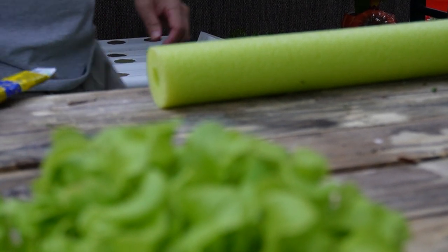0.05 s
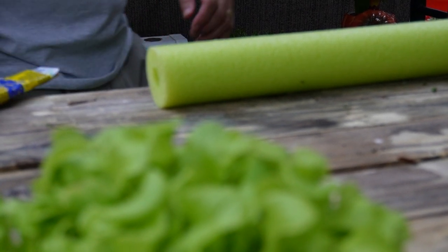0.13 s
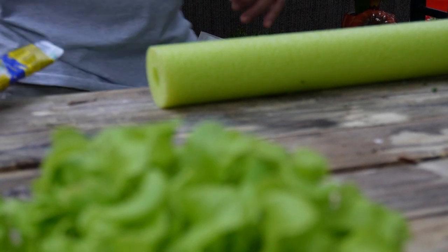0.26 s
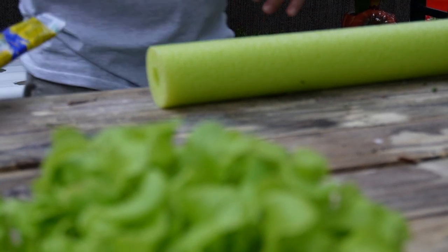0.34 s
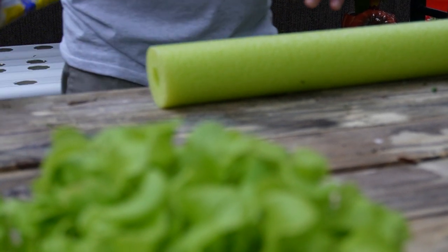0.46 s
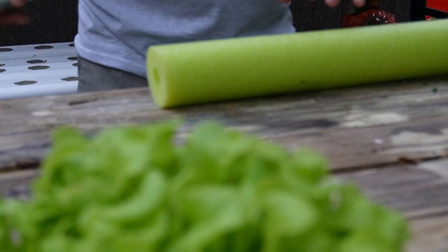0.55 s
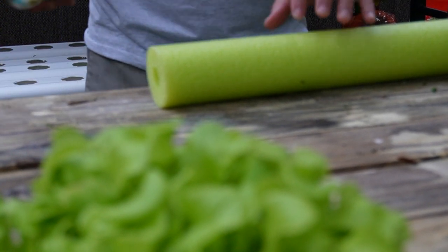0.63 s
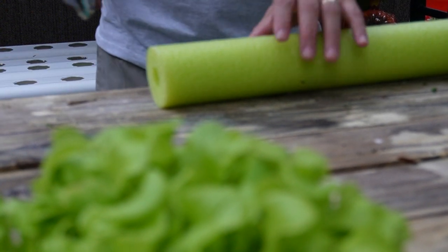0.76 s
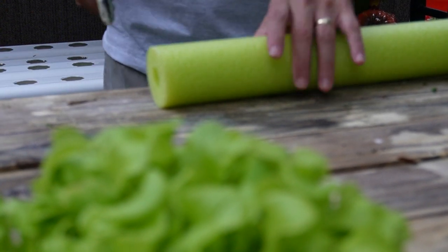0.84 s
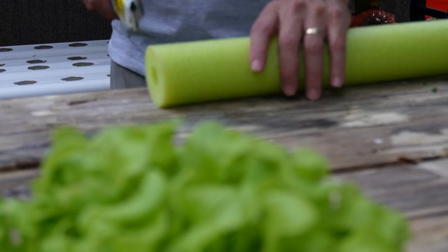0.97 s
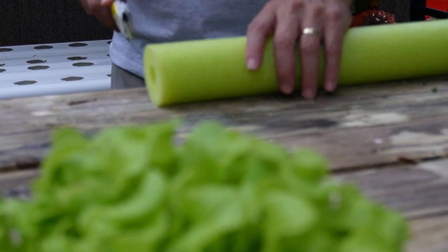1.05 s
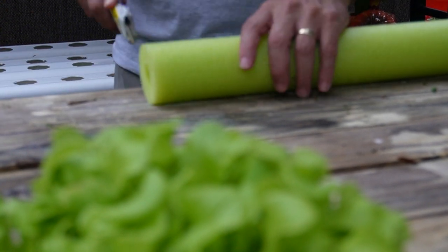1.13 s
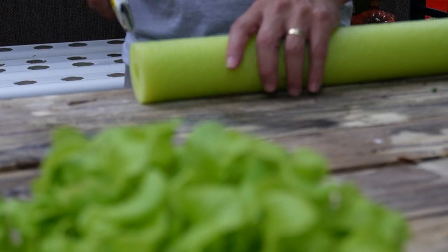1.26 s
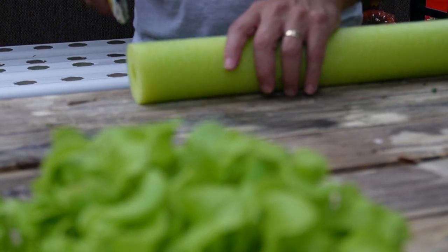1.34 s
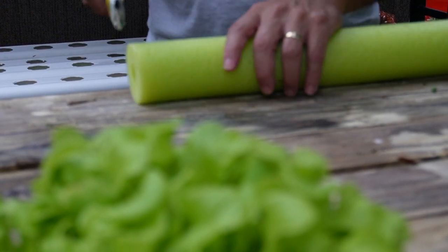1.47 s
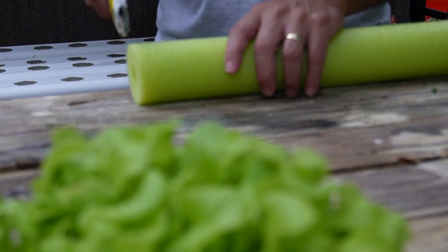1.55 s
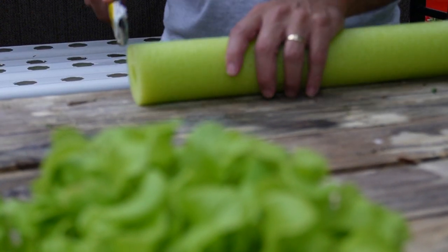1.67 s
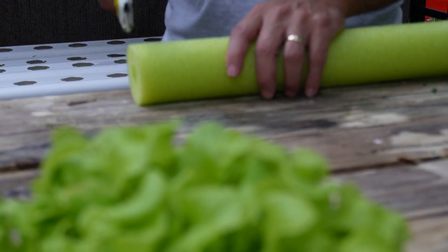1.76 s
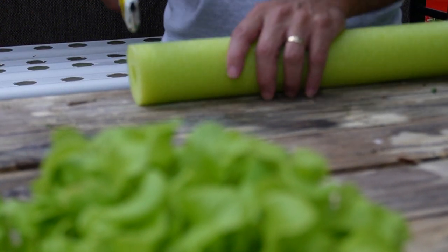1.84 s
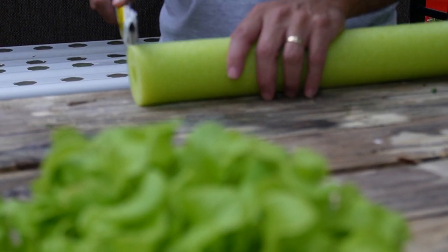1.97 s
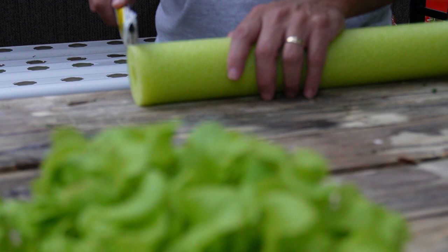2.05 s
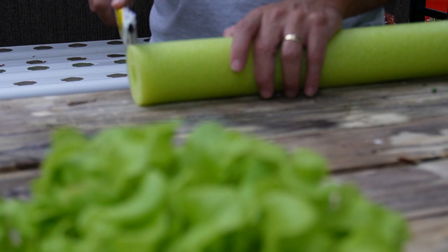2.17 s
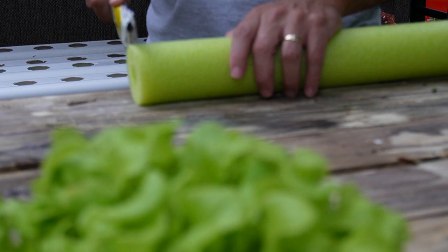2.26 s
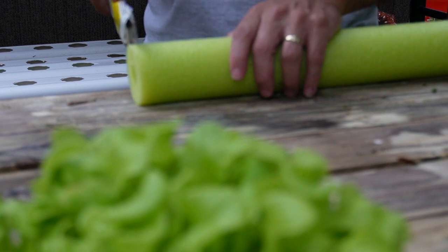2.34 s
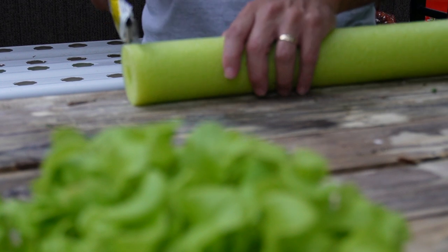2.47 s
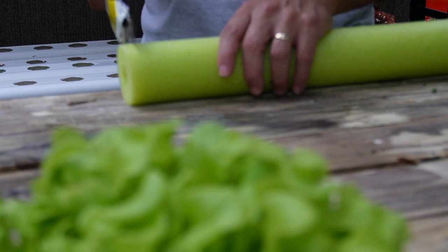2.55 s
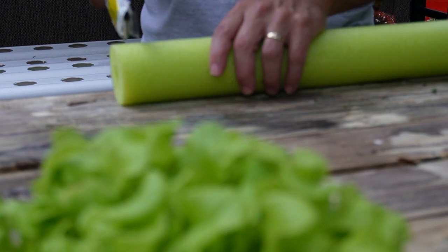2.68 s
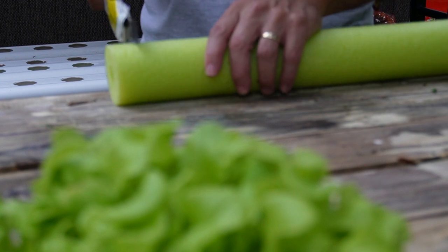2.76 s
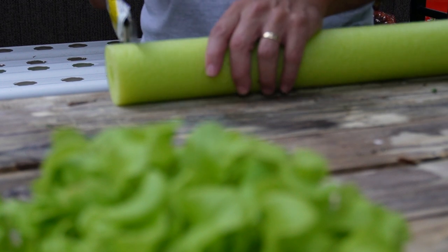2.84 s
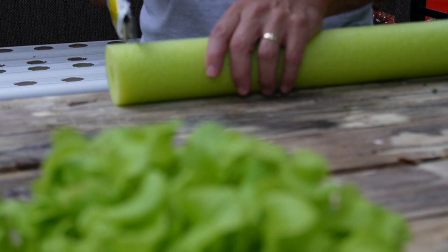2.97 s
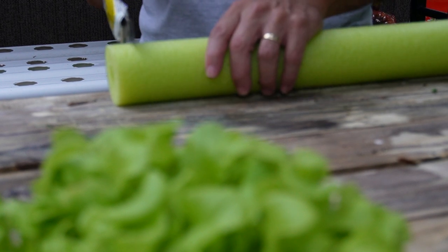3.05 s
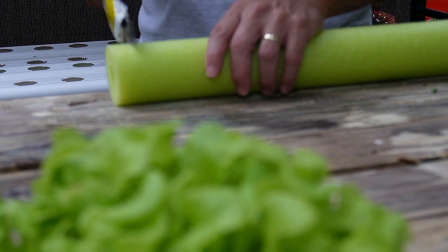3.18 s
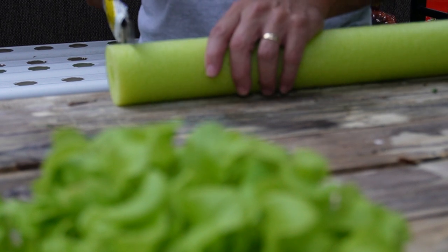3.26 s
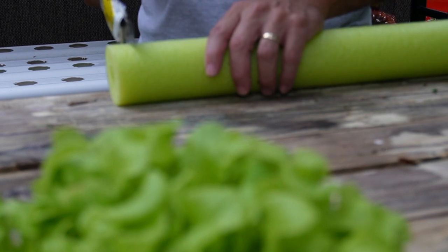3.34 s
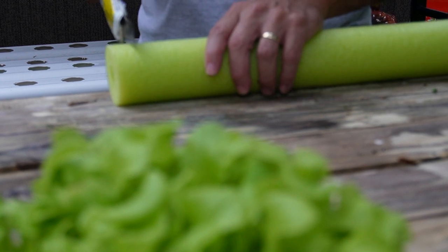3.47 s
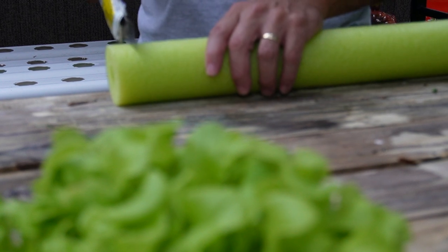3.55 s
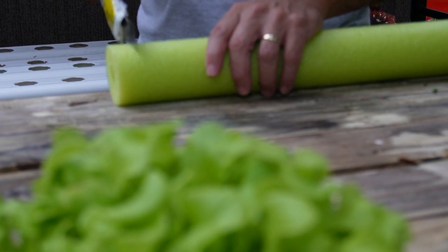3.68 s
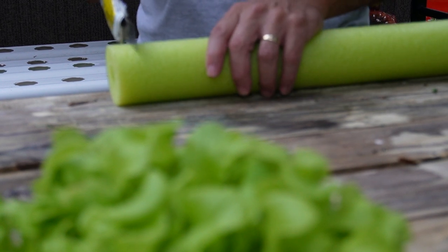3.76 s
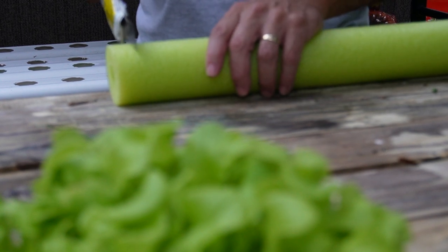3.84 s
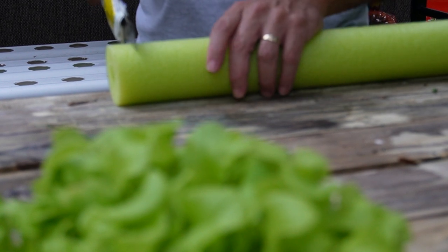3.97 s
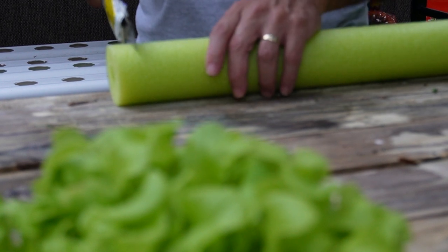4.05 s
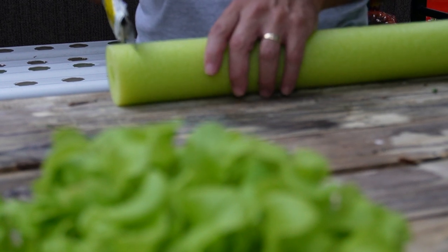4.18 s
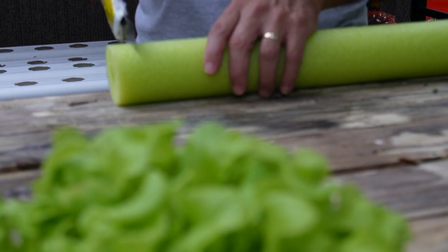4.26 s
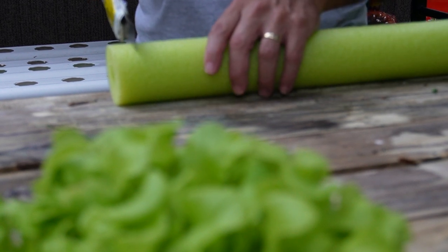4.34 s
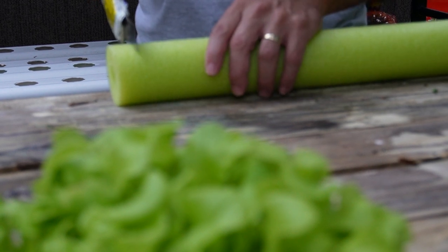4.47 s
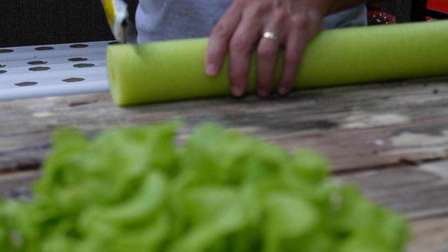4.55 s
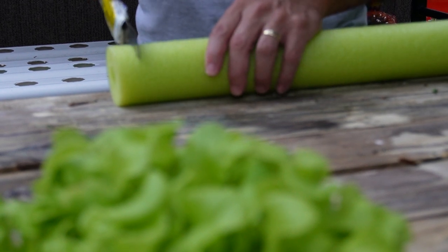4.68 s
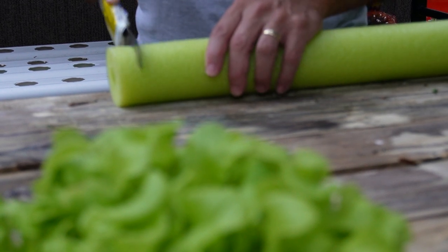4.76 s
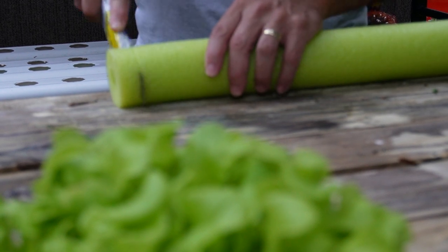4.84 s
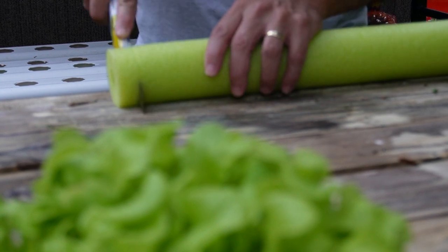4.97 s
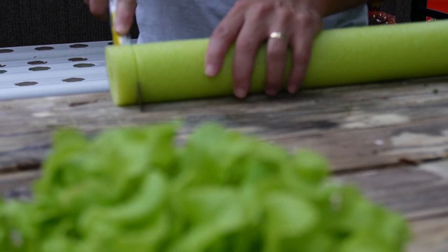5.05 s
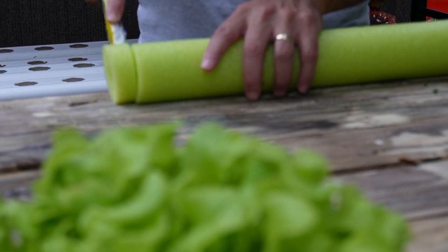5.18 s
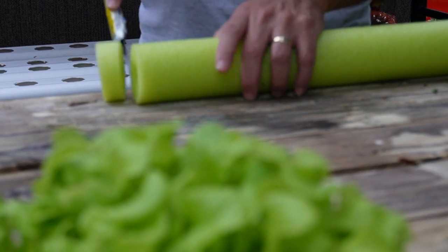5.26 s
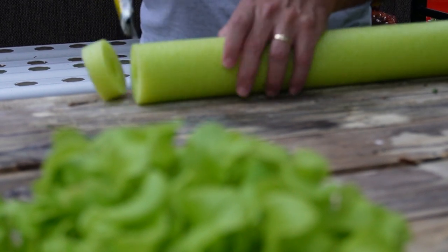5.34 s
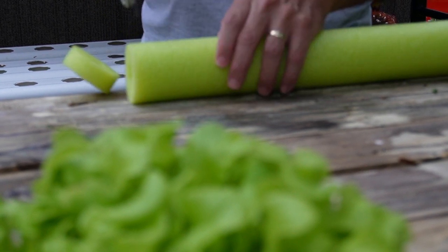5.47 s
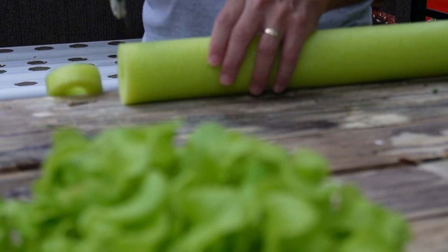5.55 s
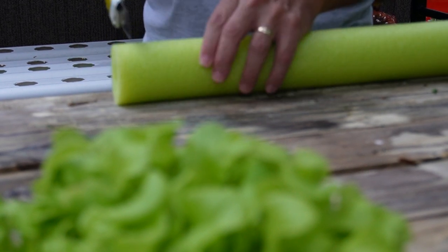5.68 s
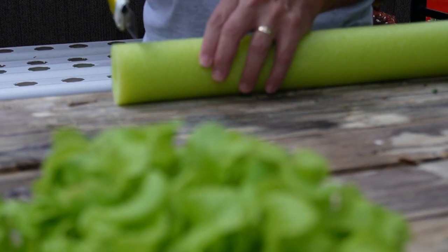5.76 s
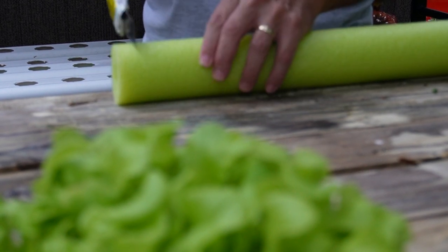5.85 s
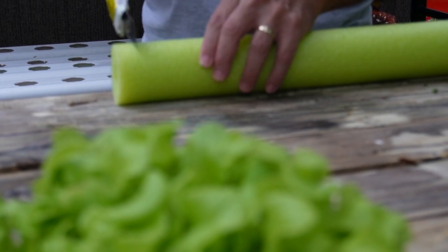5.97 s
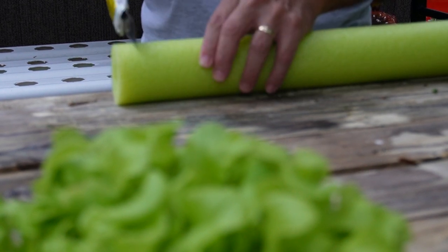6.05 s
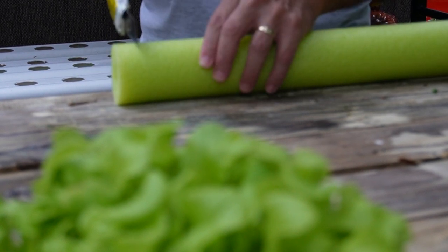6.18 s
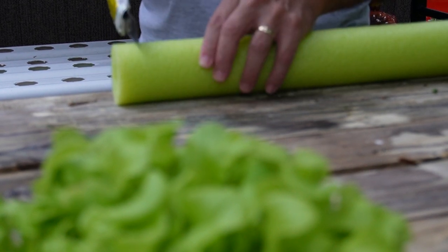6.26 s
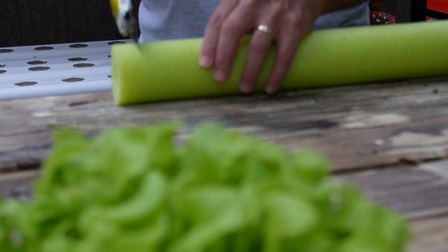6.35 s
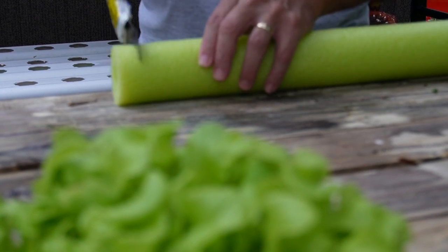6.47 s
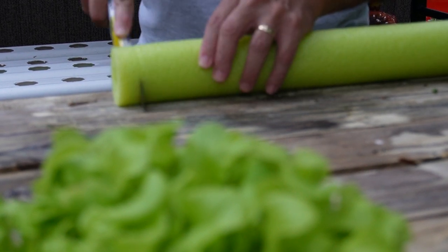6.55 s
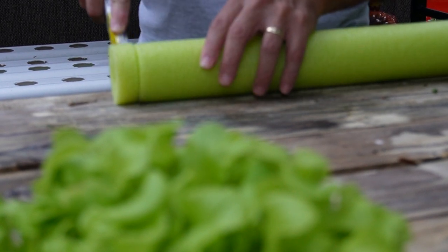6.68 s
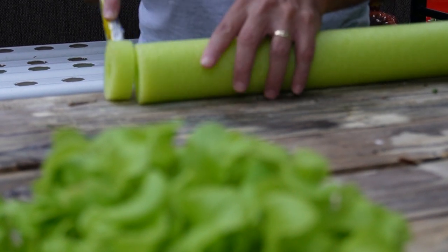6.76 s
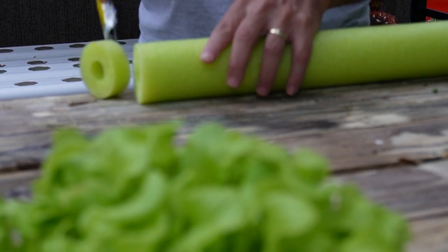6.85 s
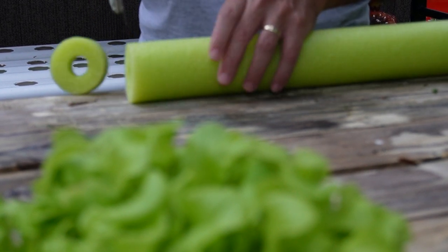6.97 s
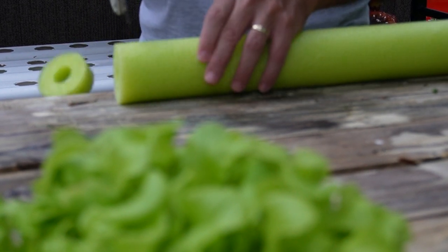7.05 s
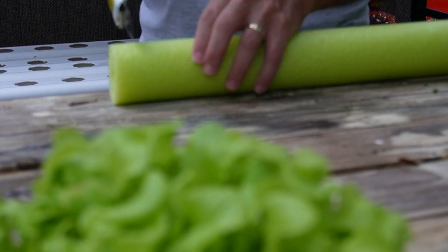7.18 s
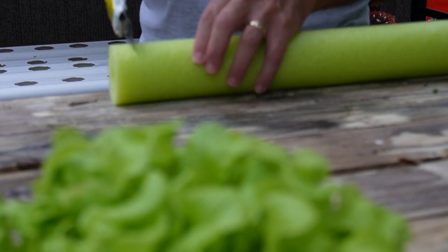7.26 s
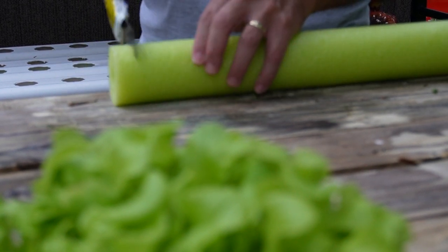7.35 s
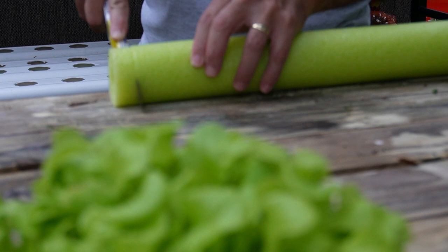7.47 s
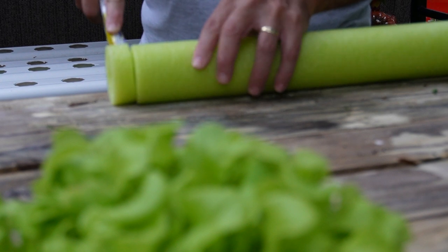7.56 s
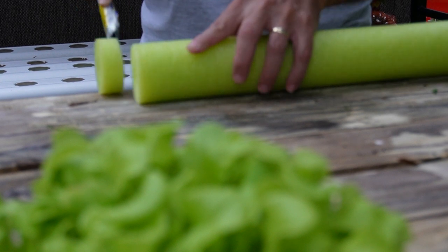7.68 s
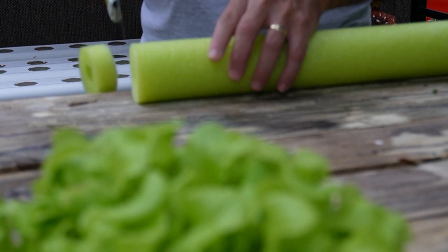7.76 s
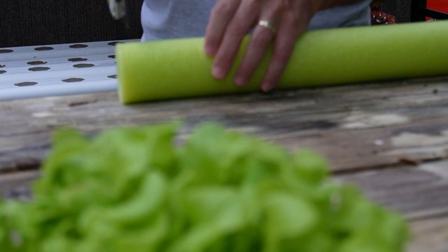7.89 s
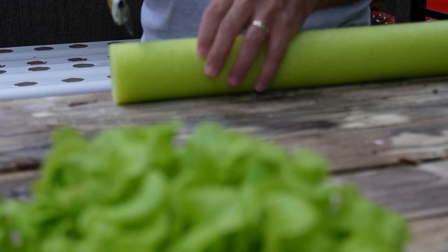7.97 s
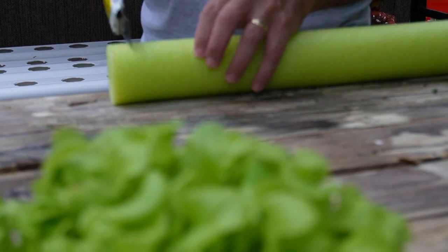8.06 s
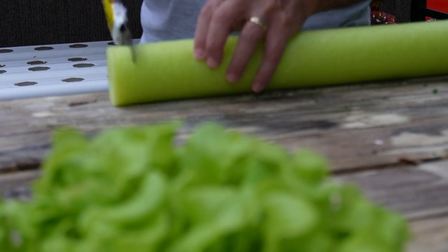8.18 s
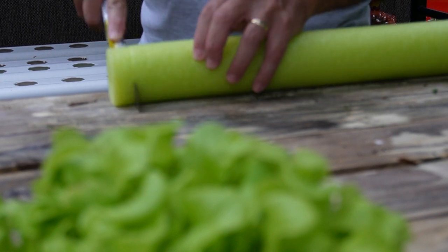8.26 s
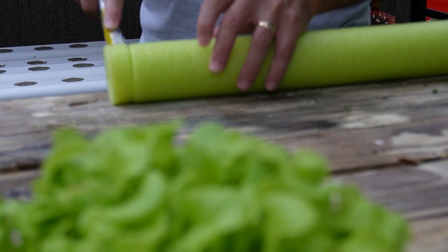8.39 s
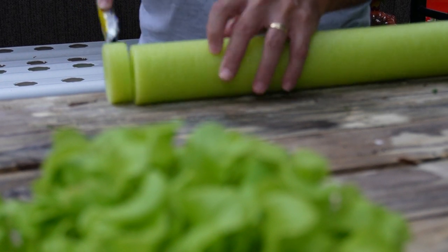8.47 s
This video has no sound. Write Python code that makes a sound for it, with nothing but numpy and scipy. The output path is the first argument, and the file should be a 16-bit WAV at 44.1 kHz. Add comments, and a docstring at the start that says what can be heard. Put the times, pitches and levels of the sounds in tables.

```python
"""Four harsh tearing strokes: a knife cuts slices off a foam tube on a wooden table, close to a microphone.
On each down-stroke the blade sticks and slips and foam cells burst in bunches (gated click noise);
then it rasps back out, while hand and tube rub more softly and small snaps and slice drops stand out.
Behind lie distant traffic (shaped noise), a low engine drone and faint narrow-band chirping at the start."""
import sys
import numpy as np
from scipy import signal
from scipy.fft import rfft, irfft
from scipy.io import wavfile
from scipy.ndimage import uniform_filter1d

SR = 44100
rng = np.random.default_rng(int(sys.argv[2]) if len(sys.argv) > 2 else 0)


def transcribe(signal):
    """Save signal, clipped to [-1, 1], as a 16-bit WAV file at the path in sys.argv[1]."""
    frames = np.atleast_2d(signal).T
    limited = np.clip(frames, -1, 1)
    pcm = np.round(limited * 32767).astype(np.int16)
    wavfile.write(sys.argv[1], SR, pcm)


N = 375732

# Blade drawn back out through the slit. Each row: start in seconds, end in seconds, level in dB,
# level change over the pull in dB, treble relative to the rest in dB.
PULLS = [(5.066, 5.247, -31.5, 1, -3.5), (6.65, 6.796, -30.5, -1, -3.5), (7.55, 7.644, -23.5, -4.5, -7),
         (8.356, 8.466, -31, 2.5, -2.5)]
# Spectrum of tearing foam. Each row: frequency in Hz, relative density in dB per Hz.
CUT_COLOUR = [(88, -63), (150, -29), (303, -14.5), (888, -4), (960, -3), (1080, 1.5), (1500, -12.5),
              (1900, -7.5), (3040, -1), (3920, -7), (7920, -12), (11700, -18), (15100, -20.5),
              (16000, -19.5)]
# Spectrum of the blade rasping on cut faces. Each row: frequency in Hz, relative density in dB per Hz.
PULL_COLOUR = [(400, -26.5), (900, -10), (1170, -7), (3470, -5), (4250, -2.5), (6720, -4), (14900, -9.5),
               (16000, -5)]


def undb(db):
    """Amplitude factor from dB."""
    return 10 ** (np.asarray(db) / 20)


def unit(x):
    """Scales to rms 1."""
    return x / np.sqrt(np.mean(x ** 2))


def curve(rows):
    """Gain over time from (s, dB) rows, interpolated on amplitude to the power 2/3."""
    s, db = np.transpose(rows)
    return np.interp(np.arange(N) / SR, s, undb(2 * db / 3)) ** (3 / 2)


def colour(x, points, size=2048):
    """Minimum-phase filter of the given (Hz, dB) shape and unit power gain, built from the cepstrum."""
    hz, db = np.transpose(points)
    grid_hz = np.maximum(np.arange(size // 2 + 1) * SR / size, 1)
    shape_db = np.interp(np.log(grid_hz), np.log(hz), db)
    cepstrum = irfft(np.log(undb(shape_db)))
    cepstrum[1:size // 2] *= 2  # fold to the causal side
    cepstrum[size // 2 + 1:] = 0
    taps = irfft(np.exp(rfft(cepstrum)))
    taps = taps / np.sqrt(np.sum(taps ** 2))
    return signal.fftconvolve(x, taps)[:len(x)]


def ring(x, modes):
    """Sum of resonances (Hz, width in Hz, dB) driven by x."""
    return sum(undb(db) * signal.lfilter(*signal.iirpeak(hz, hz / width_hz, SR), x)
               for hz, width_hz, db in modes)


def split(x, hz):
    """Low and high parts around hz that add up to the whole."""
    low = signal.sosfiltfilt(signal.butter(2, hz, fs=SR, output="sos"), x)
    return low, x - low


def walk(rate_hz):
    """Random levels held 1 / rate_hz seconds, smoothed twice; spread near 1."""
    k = int(SR / rate_hz)
    held = np.repeat(rng.standard_normal(N // k + 1), k)
    return 1.3 * uniform_filter1d(uniform_filter1d(held, k), k)[:N]


def cells(spread_db):
    """Foam cells bursting: dense clicks, a few much larger than the rest."""
    return unit(rng.standard_normal(N) * undb(spread_db * rng.exponential(size=N)))


def cutting():
    """Stick-slip: each slip tears a bunch of cells for a few milliseconds, over a steadier fizz."""
    slip_rate_hz, slip_spread_db = 125, 1.8
    turns = np.cumsum(slip_rate_hz * (1 + .4 * walk(90))) / SR
    slip_sizes = undb(slip_spread_db * rng.standard_normal(int(turns[-1]) + 2))
    phase = turns % 1
    pulse = np.minimum(phase / 0.045, 1) / (1 + (phase / 0.39) ** 6)
    slip = slip_sizes[turns.astype(int)] * pulse
    tearing = colour(unit(slip + .4) * cells(3.2), CUT_COLOUR)
    honk, body = split(split(tearing, 4000)[0], 1600)
    fizz = split(colour(unit(slip + .8) * cells(2.8), CUT_COLOUR), 3600)[1]
    return cut_gain() * (honk * hollow() + body + fizz)


def cut_gain():
    """Stroke level: a bell in dB, rising slower than it falls, over the creep of the resting blade."""
    # Each row: blade touches in seconds, fastest moment in seconds, stroke length in seconds, level in dB.
    strokes = [(4.655, 4.889, 0.2, -13.5), (6.482, 6.59, 0.17, -13.5), (7.317, 7.479, .17, -12),
               (8.165, 8.298, .19, -14)]
    rise_share, edge_db, bell_power = 0.59, -26.5, 2.12  # rise part of stroke; bell at both ends; flatness
    creep_db, creep_after_s, touch_s = -44.5, .19, .03
    t, gain = np.arange(N) / SR, 0
    for touch, top, length, db in strokes:
        before, after = (top - t) / rise_share, (t - top) / (1 - rise_share)
        u = np.where(t < top, before, after) / length
        bell = undb(db + edge_db * np.minimum(u, 4) ** bell_power)
        creep = undb(creep_db) * (t < top + creep_after_s)
        gain = gain + np.clip((t - touch) / touch_s, 0, 1) * (bell + creep)
    return gain


def hollow():
    """Gain of the hollow core's honk: damped once the blade has passed it, until the slice is off."""
    # Each entry: blade has passed the core, in seconds.
    core_passed_s = [4.925, 6.595, 7.49, 8.318]
    honk_db, damped_db, fade_s = 2, -9, .012
    rows = []
    for core, pull in zip(core_passed_s, PULLS):
        off = pull[1]
        rows += [(core, honk_db), (core + fade_s, damped_db), (off, damped_db), (off + fade_s, honk_db)]
    return curve(rows)


def pulling():
    """The flat of the blade rasps along the cut faces, stops quickly, then the foam settles."""
    attack_s, stop_t60_s, settle_db, settle_t60_s = 0.011, .07, -13, 0.43
    low, high = split(colour(cells(2.5) * undb(1.9 * walk(90)), PULL_COLOUR), 3200)
    t, out = np.arange(N) / SR, 0
    for start, end, db, change_db, treble_db in PULLS:
        after = np.maximum(t - end, 0)
        stop = undb(-60 * after / stop_t60_s)
        settle = undb(settle_db - 60 * after / settle_t60_s)
        level = undb(np.interp(t, [start, end], [db, db + change_db]))
        gain = np.clip((t - start) / attack_s, 0, 1) * level * np.maximum(stop, settle)
        out = out + gain * (low + high * undb(treble_db))
    return out


def snaps():
    """Foam snaps and blade ticks: a sharp bright click, a ragged tail, a lower and longer tube answer."""
    # Each row: time in seconds, treble level in dB, body relative to treble in dB.
    snap_rows = [(1.052, -52, 4), (3.3843, -45.5, -10), (3.6316, -36.5, -9.5), (3.652, -32.5, -10.5),
                 (3.6624, -38.5, -14), (3.6995, -44, -23), (4.331, -51.5, -2), (4.363, -56, -8),
                 (4.5848, -37.5, -0.5), (4.6638, -28.5, -4), (4.6785, -33.5, -8), (4.6927, -20, -4.5),
                 (4.7435, -19, -5), (4.7986, -20, 3), (4.951, -10, -12.5), (5.0703, -19, -5.5),
                 (5.0793, -1, -6), (5.2366, -21.5, -3.5), (5.2495, -11, -1.5), (6.1588, -48, -6),
                 (6.4949, -19.5, 0), (6.5044, -12.5, -2.5), (6.5166, -15, -8), (6.6599, -5.5, -9),
                 (6.669, -19, 4), (6.7927, -10.5, -13), (7.2968, -35, -16), (7.3198, -28.5, -7),
                 (7.3587, -22, -19), (7.3786, -14, -7), (7.3929, -14.5, -0.5), (7.4018, -23, 1),
                 (7.4124, -17.5, 6), (7.5458, 1.5, -6), (7.5508, 3, -3.5), (7.6317, -11.5, -16),
                 (7.643, -8.5, -11.5), (8.1778, -21, -13), (8.193, -13.5, -7), (8.2168, -5, -6.5),
                 (8.2347, -16, 0), (8.47, -12.5, -8.5)]
    ticks_per_s, tick_db, tick_spread_db = 5, -66, 5  # faint random ticks, spread evenly over the scene
    low, high, t = np.zeros(N), np.zeros(N), np.arange(2000) / SR
    click = undb(-60 * t / .002)
    crack = click + undb(-9.0 - 60 * t / .018) * np.minimum(t / 0.0013, 1)
    thump = click + undb(-5.5 - 60 * t / 0.039) * np.minimum(t / .0015, 1)
    at, size = rng.random((int(ticks_per_s * N / SR), 2)).T
    ticks = [(s * (N - 2000) / SR, tick_db - tick_spread_db * np.log(1 - z), -10) for s, z in zip(at, size)]
    rows = ticks + list(snap_rows)
    for (s, db, body_db), noise in zip(rows, rng.standard_normal((len(rows), 2000))):
        high[int(s * SR):][:2000] += noise * crack * undb(db)
        low[int(s * SR):][:2000] += noise * thump * undb(db + body_db)
    answer = split(colour(low, CUT_COLOUR), 3900)[0]
    honk, body = split(split(answer, 700)[1], 1400)
    treble = split(colour(high, PULL_COLOUR), 4800)[1]
    return treble + body + honk * hollow()


def rubbing():
    """Hand and tube sliding: finer crackle with a flickering grip; each slide swells and fades."""
    # Each row: start in seconds, length in seconds, level in dB.
    slides = [(0.932, .06, -72), (1.028, .08, -64), (1.113, 0.14, -61), (1.235, 0.27, -62.5),
              (2.125, 0.11, -72), (2.248, 0.24, -70.5), (2.41, 0.5, -57.5), (2.85, 0.25, -75.5),
              (3.596, 0.18, -68), (4.313, 0.073, -65), (4.506, 0.23, -63), (5.314, 0.13, -57),
              (5.426, 0.35, -54.5), (5.855, .03, -70), (6.07, 0.046, -72.5), (6.925, 0.31, -49.5),
              (7.224, 0.12, -63), (7.655, 0.092, -52.5), (7.724, 0.086, -54.5), (7.805, 0.11, -53),
              (7.893, 0.14, -52), (8.008, 0.16, -57)]
    # Each row: frequency in Hz, relative density in dB per Hz.
    rub_colour = [(710, -28), (1200, -3.5), (1720, -3), (1850, -2.5), (2020, -5.5), (2830, 1.5),
                  (3740, -11), (5590, -8.5), (8720, -14), (14800, -12), (16000, -10)]
    skew, roundness = 0.99, 1.05  # peak position; softness of the ends
    gain = np.zeros(N)
    for s, length, db in slides:
        u = np.linspace(0, 1, int(length * SR))
        gain[int(s * SR):][:len(u)] += undb(db) * np.abs(np.sin(np.pi * u ** skew)) ** roundness
    grip_db = 1.3 * walk(60) + .8 * walk(20)
    return gain * colour(cells(2.8) * undb(grip_db), rub_colour)


def drops():
    """A soft slice pushes the boards: a decaying noise burst through the table's resonances."""
    # Each row: time in seconds, push level in dB.
    pushes = [(5.245, -31), (5.275, -31), (6.79, -32), (7.642, -31), (8.465, -28)]
    # Board resonances. Each row: frequency in Hz, width in Hz, level in dB.
    wood = [(200, 110, 3), (368, 300, 5), (875, 400, 6), (1300, 600, 7)]
    push, t = np.zeros(N), np.arange(1500) / SR
    for (s, db), noise in zip(pushes, rng.standard_normal((len(pushes), 1500))):
        push[int(s * SR):][:1500] += undb(db) * noise * np.exp(-t / 0.017)
    return ring(push, wood)


def town():
    """Traffic noise in octave bands that swell together and flicker alone; stereo width grows with Hz."""
    # Each row: frequency in Hz, relative density in dB per Hz.
    town_colour = [(12, -68.5), (20, -38), (46, -9), (74, 0.5), (285, -13.5), (422, -18), (459, -16.5),
                   (499, -19.5), (976, -14.5), (2080, -33), (4670, -44), (11400, -52.5), (16000, -55)]
    level_db, swell_db, flicker_db = -55, .5, 1.4
    out, swell, (at, db) = 0, walk(0.79), np.transpose(town_colour)
    f = np.fft.rfftfreq(N, 1 / SR)
    shape = undb(np.interp(np.log(f + 1), np.log(at), db))
    mid, side = (rfft(rng.standard_normal(N)) * shape for _ in range(2))
    side *= np.clip(f / 4500, .012, .55)
    for octave in range(4, 15):
        share = np.clip(1 - np.abs(np.log2(f + 1) - octave), 0, 1)
        pair = irfft(np.array([mid + side, mid - side]) * share, N)
        out = out + pair * undb(swell_db * swell + flicker_db * walk(3))
    return unit(out) * undb(level_db)


def engine():
    """A far engine drones in a few wavering low notes: noise through each resonance bank twice."""
    # Each row: time in seconds, level in dB.
    engine_level = [(6.4, -110), (6.9, -52.5), (7.3, -44), (8.1, -51), (8.52, -48.5)]
    # Each row: frequency in Hz, width in Hz, level per pass in dB.
    notes = [(56.8, 27, -6), (80.6, 8, -3), (105, 12, 0), (166.4, 26, -3.5)]
    return unit(ring(ring(rng.standard_normal(N), notes), notes)) * curve(engine_level)


def chirps():
    """Faint far chirping: narrow bands of noise that fade in and out."""
    # Each row: start in seconds, end in seconds, frequency in Hz, width per pass in Hz, level in dB.
    chirp_rows = [(0, .39, 4560, 400, -86), (.38, .8, 6120, 15, -89)]
    t, out = np.arange(N) / SR, 0
    for start, end, hz, width_hz, db in chirp_rows:
        gate = np.clip(np.minimum(t - start, end - t) / 0.02, 0, 1)
        mode = [(hz, width_hz, 0)]
        band = unit(ring(ring(rng.standard_normal(N), mode), mode))
        out = out + gate * band * undb(db)
    return out


def scene():
    """All foam sounds get a short outdoor tail and a wide treble, then join the background."""
    yard_db, yard_t60_s = -18, .1
    side_db, side_hz, pan_db = -9, 3500, -1  # pan: left relative to right
    foam = cutting() + pulling() + rubbing() + snaps() + drops()
    t = np.arange(int(yard_t60_s * SR)) / SR
    tail = unit(rng.standard_normal(len(t)) * undb(-60 * t / yard_t60_s)) / np.sqrt(len(t))
    foam = foam + undb(yard_db) * signal.fftconvolve(foam, tail)[:N]
    # fast random left-right jitter widens the treble of all foam sounds
    jitter = walk(2500) * foam
    side = undb(side_db) * signal.lfilter(*signal.butter(1, side_hz, "high", fs=SR), jitter)
    pair = np.array([(foam + side) * undb(pan_db / 2), (foam - side) * undb(-pan_db / 2)])
    return pair + town() + engine() + chirps()


def record(dry):
    """The microphone chain rounds the loudest peaks (tanh) and cuts the top with a steep low-pass."""
    top_hz = 15700
    rounded = np.tanh(.9 * dry) / .9
    return signal.sosfilt(signal.ellip(10, .2, 60, top_hz, fs=SR, output="sos"), rounded)


dry = scene()
out = record(dry)
transcribe(out)
```